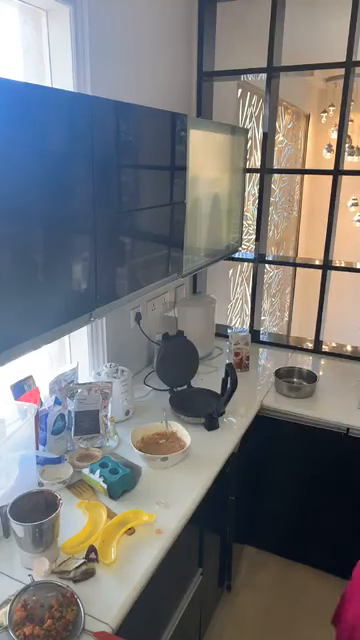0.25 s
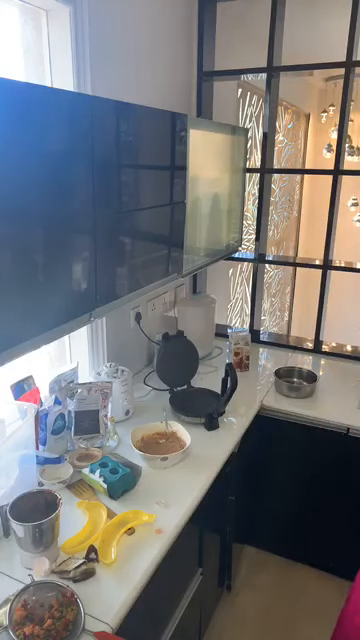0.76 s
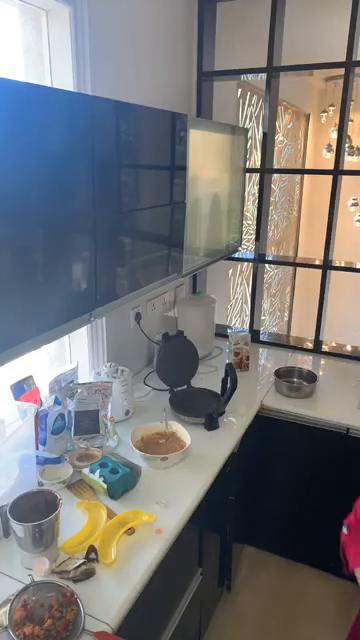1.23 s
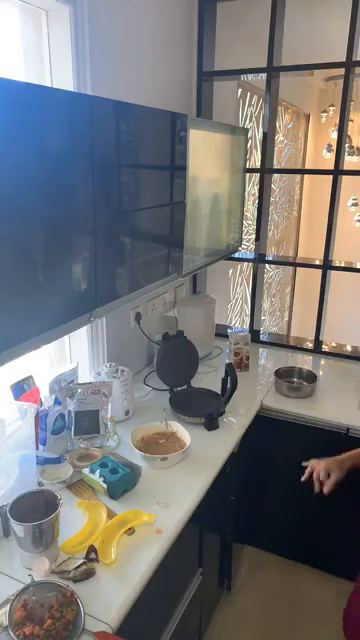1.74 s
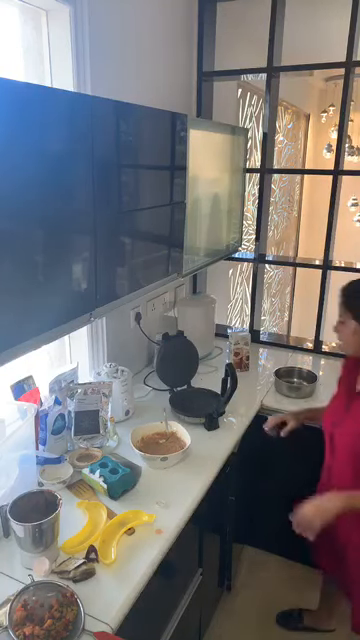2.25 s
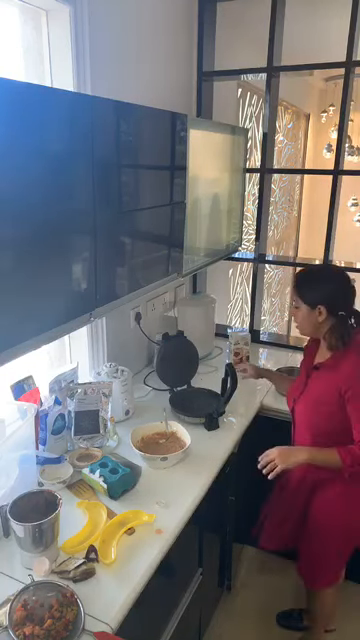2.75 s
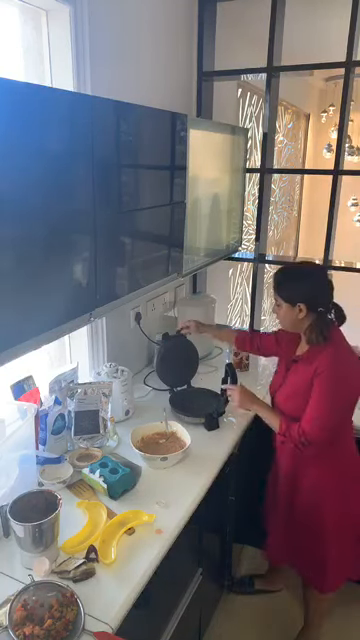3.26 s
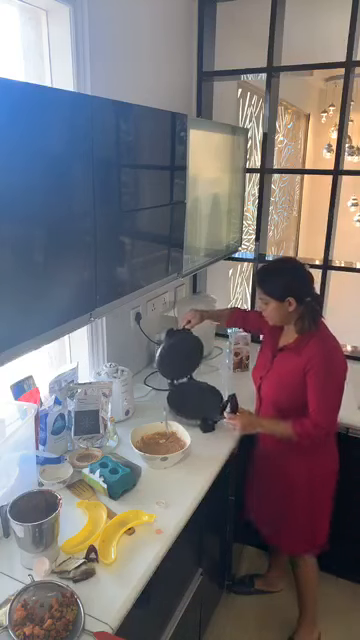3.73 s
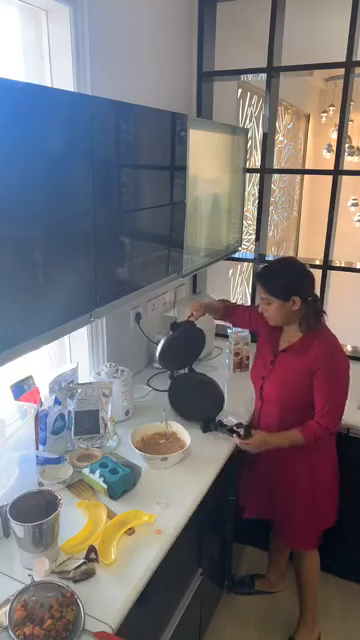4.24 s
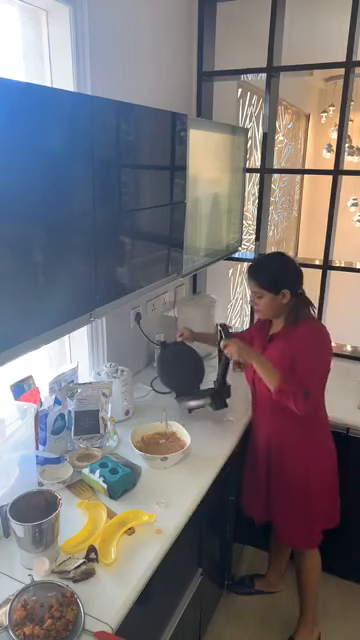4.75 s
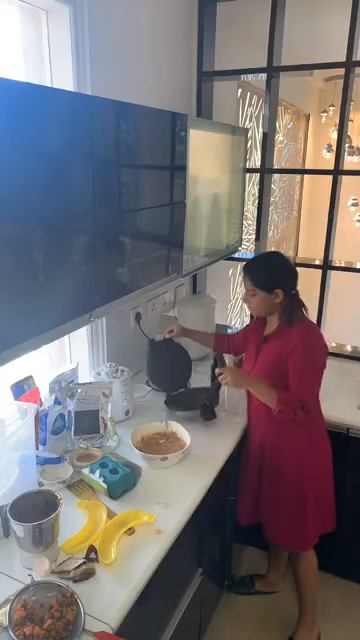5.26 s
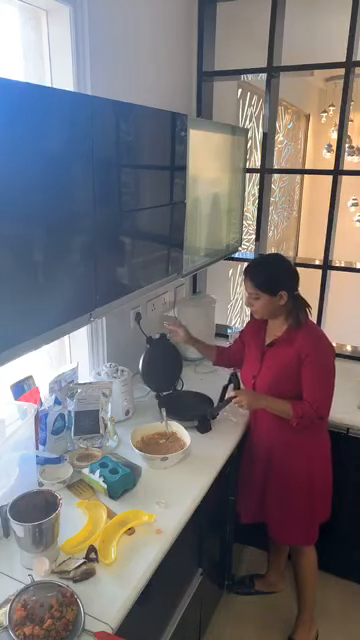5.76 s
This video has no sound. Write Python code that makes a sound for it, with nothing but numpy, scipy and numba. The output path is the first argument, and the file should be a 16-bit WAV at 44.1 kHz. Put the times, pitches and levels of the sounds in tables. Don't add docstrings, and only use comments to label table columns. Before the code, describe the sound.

A phone a few metres away hears a tiled, reverberant kitchen with a faint low fridge drone and soft hiss throughout. Right at 0 s a sharp, dry wooden knock, by far the loudest event, with tiny rattling rebounds, dies away over most of a second. Very soft slipper touches and scuffs come at 0.5, 0.85 and 1.1 s, with a firmer step and low floor rumble around 1.5 s. A quick cluster of clearer footfalls lands at 2.0-2.1 s, then a long sole drag from 2.3 to 2.75 s hisses and growls, strongest near 2.55. Small steps and a short rub follow at 3.1 s. The hinged press clicks brightly at 3.48, knocks at 3.85-3.9, ticks faintly near 4.4, and clicks crisply at 4.56. A heavier thump on stone comes at 5.06, duller knocks at 5.4 and 5.55, and a last knock with a slight rub at 5.73 s, fading into room tone.

```python
import sys
import numpy as np
from scipy import signal
from scipy.fft import rfft, irfft
from scipy.io import wavfile
from scipy.ndimage import uniform_filter1d
from numba import njit

SR = 44100
rng = np.random.default_rng(int(sys.argv[2]) if len(sys.argv) > 2 else 0)


def persist_wave(psi):
    counts = np.round(np.clip(psi, -1, 1) * 32767).astype(np.int16)
    wavfile.write(sys.argv[1], SR, np.atleast_2d(counts).T)


def ratio_of_db(decibels):
    return 10 ** (np.asarray(decibels, float) / 20)


N = 264618


def shape(x, table):
    hz, db = np.transpose(table)
    bins = np.maximum(np.arange(len(x) // 2 + 1) * SR / len(x), 1)
    gain = ratio_of_db(np.interp(np.log(bins), np.log(hz), db))
    return irfft(rfft(x) * gain, len(x))


def unit(x):
    return x / np.sqrt(np.mean(x ** 2))


def ring(x, hz, width):
    return signal.lfilter(*signal.iirpeak(hz, hz / width, fs=SR), x)


def ping(hz, width):
    tap = 1. * (np.arange(SR // 3) == 0)
    tone = ring(ring(tap, hz, width), hz, 2 * width)
    return tone / np.abs(tone).max()


def walk(rate):
    k = int(SR / rate)
    stairs = np.repeat(rng.standard_normal(N // k + 1), k)
    smooth = uniform_filter1d(uniform_filter1d(stairs, k), k)
    return unit(smooth[:N])


@njit
def sweep(x, hz, damp):
    y, band, low = np.empty(len(x)), 0., 0.
    for i in range(len(x)):
        g = np.tan(np.pi * hz[i] / SR)
        v = (band + g * (x[i] - low)) / (1 + g * (g + damp[i]))
        band = 2 * v - band
        low = low + 2 * g * v
        y[i] = np.sqrt(damp[i]) * v
    return y


ZONE_EDGES_HZ = [130, 700, 1800, 4800]


def blows(table, modes, zone_db):
    table = np.array(table)
    hz, width, db = np.transpose(modes)
    zone = np.searchsorted(ZONE_EDGES_HZ, hz)
    s, strength, hard, focus, weight = table.T[:, :, None]
    step = zone - 2
    drive = np.where(zone == 0, weight, strength + hard * step - focus * step ** 2)
    lands_db = 1.2 * rng.standard_normal((len(table), len(hz)))
    sign = (-1) ** np.arange(len(hz))
    gains = ratio_of_db(drive + np.array(zone_db)[zone] + db + lands_db) * sign
    return table[:, 0], gains @ np.array([ping(f, w) for f, w in zip(hz, width)])


def strike(times, sounds, direct_db, early_s, early_db, room_db):
    out = np.zeros((2, N + SR))
    for s, sound in zip(times, sounds):
        fade = np.exp(-np.arange(len(sound)) / SR / early_s)
        cluster = rng.standard_normal(len(sound)) * ratio_of_db(early_db) * fade
        cluster[0] = ratio_of_db(direct_db)
        span = slice(int(s * SR), int(s * SR) + len(sound))
        out[0, span] += signal.fftconvolve(sound, cluster)[:len(sound)]
        out[1, span] += ratio_of_db(room_db) * sound
    return out[:, :N]


# t/s, level/dB, hardness/dB per group, focus on the middle groups/dB, weight/dB
KNOCK = [
    (0.0064, -10, -0.5, 9, -54),
    (0.0104, -31.5, -12.5, -6, -67),
    (0.0221, -30.5, 1.5, 2, -50),
]
# f/Hz, width/Hz, level/dB
BOARD = [(80, 51, -8), (180, 125, -7), (367.4, 48, -0.5), (567, 153, 1.5), (665, 190, -1), (944, 240, -1),
         (1370, 240, -6), (1970, 590, -1), (3530, 660, -13.5), (4300, 650, -7), (5740, 560, -0.5),
         (6860, 1600, -0.5), (8600, 3600, 5.5), (14000, 2600, -5)]


def knock():
    return strike(*blows(KNOCK, BOARD, [-11, -4.5, -6, -4.5, -5.5]),
                  direct_db=-11.0, early_s=0.0066, early_db=-20.0, room_db=-3.0)


# t/s, level/dB, hardness/dB per group, focus on the middle groups/dB, weight/dB
PRESS = [(3.465, -47.5, -7, -0.5, -63), (3.477, -33, 17, 11.5, -56), (3.4831, -39.5, 6.5, 0.5, -62),
         (3.8433, -43, -4, 1, -54), (3.8865, -34.5, -1, 2.5, -34.5), (4.1087, -72, 1, 4, -70),
         (4.3715, -51.5, -0.5, 6, -63), (4.3923, -48, -3, 12, -62), (4.558, -33, 5, 3.5, -67),
         (5.0566, -34.5, -2.5, 0.5, -31), (5.0725, -62, -13, -9, -20), (5.164, -65.5, -13, -1.5, -51),
         (5.412, -43, -4, -1, -35), (5.4589, -69, -5, -1, -40), (5.5561, -43, -9.5, 10.5, -54),
         (5.7248, -37.5, 3, 3, -40)]
# f/Hz, width/Hz, level/dB
PLATES = [(50.5, 15, -4), (74.7, 29, -6.5), (158, 29.5, 0.5), (208, 75, -8.5), (245, 14.5, -5),
          (321, 56, 4.5), (572, 100, -2.5), (831, 194, -4), (1143, 91, -7.5), (1412, 214, -1),
          (2130, 670, 2), (3000, 1360, 0.5), (4100, 1780, 3.5), (7000, 2360, -2.5), (8200, 2700, -3),
          (13700, 5600, -14)]


def press():
    return strike(*blows(PRESS, PLATES, [-10, -10.0, -9.5, -8.0, -1.0]),
                  direct_db=-1.3, early_s=0.014, early_db=-20, room_db=-0.54)


# t/s, f/Hz, width/Hz, level/dB
RINGS = [(0.0102, 598, 160, -21.5), (0.523, 390, 59, -53), (1.11, 1170, 45, -57), (1.545, 553, 58, -51),
         (3.476, 2330, 440, -33.5), (3.478, 740, 79, -46), (3.846, 443, 83, -43.5), (3.884, 1540, 650, -36),
         (4.394, 2600, 200, -54), (4.557, 2900, 680, -32.5), (4.561, 487, 100, -43),
         (5.413, 192, 68, -41.5), (5.725, 1670, 730, -35), (5.7255, 2270, 740, -44),
         (5.727, 4400, 420, -54), (3.885, 4700, 4030, -56), (1.504, 1100, 930, -53),
         (0.049, 2180, 500, -35.5), (0.008, 1100, 450, -30), (0.009, 6700, 3500, -44),
         (6.5, 3500, 3300, -40), (0.9, 3860, 270, -53), (1.115, 2500, 1100, -45.5), (5.08, 63, 33, -45),
         (3.9, 265, 66, -42), (4.558, 1630, 590, -35.5), (4.559, 9900, 4100, -44), (5.06, 334, 72, -41),
         (0.012, 1700, 300, -43), (4.559, 4500, 830, -38.5)]


def single_rings():
    times = [s for s, hz, width, db in RINGS]
    tones = [ratio_of_db(db) * ping(hz, width) for s, hz, width, db in RINGS]
    return strike(times, tones, direct_db=-0.77, early_s=0.019, early_db=-19.0, room_db=-0.12)


# t/s, level/dB, hardness/dB per group, focus on the middle groups/dB, weight/dB
STEPS = [(0.5226, -55.5, -8, -5.5, -45), (0.846, -61.5, 10.5, 4, -69), (1.095, -52, 8.5, 1, -62),
         (1.502, -58, -9.5, -5.5, -51), (1.5394, -43.5, -7.5, 2, -60), (1.9756, -52.5, -3, -3, -48),
         (2.0142, -36, 6, 8, -62), (2.043, -30.5, 7.5, 1, -52), (2.0711, -42.5, -10.5, -1, -38),
         (2.0977, -36, -7.5, 2.5, -53), (3.0909, -44, -1.0, 18, -74), (3.1338, -48.5, 9, 1.5, -54),
         (3.198, -61.5, -11.5, -6.5, -68), (3.3441, -63, -14, -1.5, -81)]
# f/Hz, width/Hz, level/dB
SLIPPER = [(53.5, 35, 2), (91, 23, -5.5), (180, 170, 0), (328, 113, -1.5), (580, 150, -0.5),
           (1015, 390, 5.5), (1600, 1160, 7.5), (2460, 950, -1.5), (4380, 1700, -4), (5820, 1970, -3),
           (8470, 3900, -5.5), (13000, 5800, -12)]


def steps():
    return strike(*blows(STEPS, SLIPPER, [-13.0, -7.0, -8, 0.5, -5.8]),
                  direct_db=-12, early_s=0.024, early_db=-23.0, room_db=-0.11)


def stroke(start, length, db):
    rise_share, fade_db, lift_s = 0.24, 11, 0.012
    t = np.arange(N) / SR - start
    rise = np.clip(t / (rise_share * length), 0, 1)
    fade = ratio_of_db(-fade_db * np.clip(t / length - rise_share, 0, 1))
    lift = np.clip(1 + (length - t) / lift_s, 0, 1)
    return ratio_of_db(db - 9.5) * rise * fade * lift


def friction():
    bursts_db = 2.2 * np.minimum(rng.exponential(size=N), 5)
    grit = rng.standard_normal(N) * ratio_of_db(bursts_db)
    judder = walk(40)
    slips = grit * ratio_of_db(1.8 * judder)
    fizz = unit(shape(slips, [(1200, -60), (2800, 10.0), (5000, 5.5), (9000, -0.5), (15000, -9)]))
    return slips, judder, fizz


def rub(slips, hz, damp):
    damp = np.full(N, damp)
    return unit(sweep(sweep(slips, hz, damp), hz, damp))


# t/s, pressure level/dB, rub resonance f/Hz
DRAG = [
    (2.26, -55, 1600),
    (2.33, -45, 1290),
    (2.42, -35.5, 1180),
    (2.49, -38, 1330),
    (2.56, -34.5, 1130),
    (2.6, -43, 1490),
    (2.68, -57, 1600),
    (2.74, -54, 2250),
    (2.77, -89, 2300),
]


def drag(slips, judder, fizz):
    t = np.arange(N) / SR
    s, db, hz = np.transpose(DRAG)
    centre = np.interp(t, s, hz)
    pressure = ratio_of_db(np.interp(t, s, db, -120, -120) - 9)
    free = ratio_of_db(-16 + 23.5 * np.log2(centre / hz.min()))
    return pressure * (ratio_of_db(4 * judder) * rub(slips, centre, 0.45) + free * fizz)


# t/s, length/s, level/dB, rub resonance f/Hz, fizz level over it/dB
SCUFFS = [(0.866, 0.17, -49, 2360, -48), (0.877, 0.15, -57, 4300, -23), (1.074, 0.14, -48, 1250, 0),
          (1.203, .3, -58, 1620, 2), (1.531, 0.05, -47.5, 1650, -7.5), (1.613, 0.18, -51, 1250, -5),
          (1.664, 0.08, -66, 6500, -8), (1.753, 0.47, -59, 1480, -2), (2.008, 0.057, -47, 1500, -0.5),
          (2.626, 0.1, -51, 2500, 4), (2.322, 0.38, -51.5, 2180, -30), (2.6, .14, -51.5, 840, -25),
          (2.673, 0.071, -55.5, 5400, -10), (2.875, 0.1, -58, 1600, 1), (3.1, 0.092, -42.5, 1060, -5),
          (3.44, .04, -46.5, 1500, -9), (3.525, 0.038, -45, 2200, -3), (3.635, 0.085, -58.5, 2270, 5.5),
          (4.363, .12, -54, 1860, -21), (5.75, 0.13, -51, 1630, -25)]


def scuffs(slips, fizz):
    out = np.zeros(N)
    for s, length, db, hz, fizz_db in SCUFFS:
        tone = rub(slips, np.full(N, 1. * hz), 0.89)
        out += stroke(s, length, db) * (tone + ratio_of_db(fizz_db) * fizz)
    return out


# t/s, length/s, level/dB
SHIFTS = [
    (1.003, 0.072, -52),
    (1.22, 0.39, -52),
    (1.525, 0.25, -42.5),
    (1.748, 0.23, -47.5),
    (2.14, 0.067, -38.5),
    (2.305, 0.39, -54),
    (3.397, 0.093, -45.5),
    (3.612, 0.089, -54),
    (4.39, 0.063, -52),
    (5.744, 0.09, -49),
]


def weight_shifts(slips):
    rumble = unit(shape(slips, [(90, -5), (180, 3.0), (600, 0.5), (1200, -36.5)]))
    return sum(stroke(*row) for row in SHIFTS) * ratio_of_db(-0.5) * rumble


# f/Hz, t/s
ROOM_T60 = [(60, 0.69), (250, 0.75), (1000, 0.72), (3000, 0.96), (8000, 0.71), (14000, 0.58)]


def room():
    build_s, level_db = 0.0033, -26
    t, tail = np.arange(SR) / SR, 0
    hz, t60 = np.transpose(ROOM_T60)
    echoes = rng.standard_normal(SR)
    for mid in 40 * 2. ** np.arange(0, 9):
        octave = [(mid / 2, -40), (mid / 1.59, -6), (mid, 0), (mid * 1.476, -6), (mid * 2, -40)]
        decay_s = np.interp(np.log(mid), np.log(hz), t60)
        tail = tail + shape(echoes, octave) * ratio_of_db(-60 * t / decay_s)
    return tail * ratio_of_db(level_db) * (1 - np.exp(-(t / build_s) ** 2))


# f/Hz, width/Hz, level/dB
FRIDGE = [(29, 45, -65.5), (46.5, 28, -63.5), (66, 29, -112), (96.5, 6.3, -64.5), (131, 35, -71.5),
          (188, 10.4, -65.5)]


def fridge():
    drone = np.zeros(N)
    for hz, width, db in FRIDGE:
        hum = ring(ring(rng.standard_normal(N), hz, width), hz, 2 * width)
        drone += ratio_of_db(db) * unit(hum)
    return drone


# f/Hz, level/dB per Hz
HISS = [(82, -27), (140, -3.5), (369, -6), (415, -10.5), (477, -5.5), (642, -10), (916, -11.5),
        (1310, -16.5), (1730, -21), (1870, -16.5), (2190, -22), (5760, -31.5), (15800, -41.5)]


def room_hiss():
    return unit(shape(rng.standard_normal(N), HISS)) * ratio_of_db(-60 + 0.38 * walk(2.45))


def scene():
    slips, judder, fizz = friction()
    rubs = drag(slips, judder, fizz) + scuffs(slips, fizz) + weight_shifts(slips)
    near, far = knock() + press() + steps()
    heard = near + rubs + signal.fftconvolve(far + ratio_of_db(-6.5) * rubs, room())[:N]
    near, far = single_rings()
    heard += near + signal.fftconvolve(far, room())[:N]
    heard += fridge() + room_hiss()
    heard[:int(.006 * SR)] *= .1
    return heard[None]


# f/Hz, level/dB
MIC = [(12, -25), (30, 1), (9200, 1), (10200, -7), (12000, -6.5), (13200, -0.5), (15600, 1), (15900, -30)]


def microphone(x):
    return shape(x, MIC)


def roll_off(x):
    return signal.sosfilt(signal.butter(12, 16410, fs=SR, output="sos"), x)


def record(dry):
    mix = microphone(dry[0])[None]
    return roll_off(mix)


dry = scene()
out = record(dry)
persist_wave(out)
```